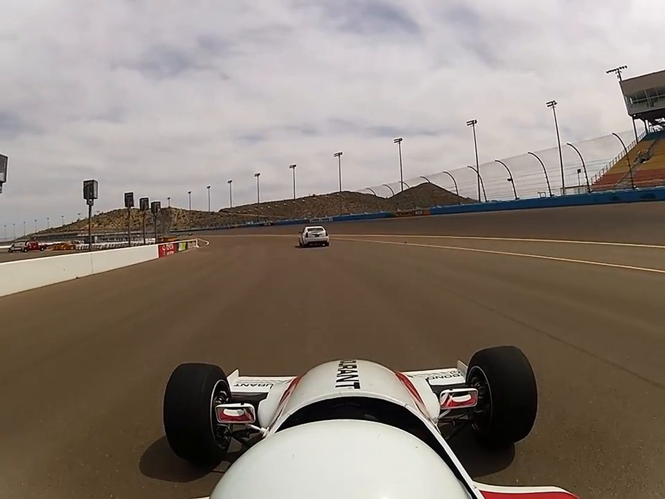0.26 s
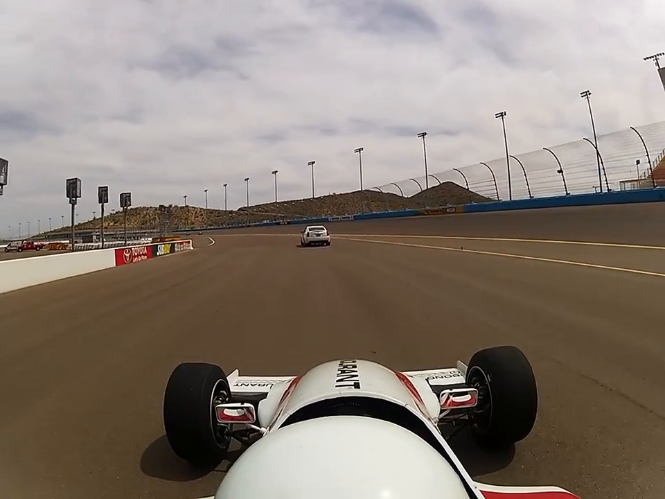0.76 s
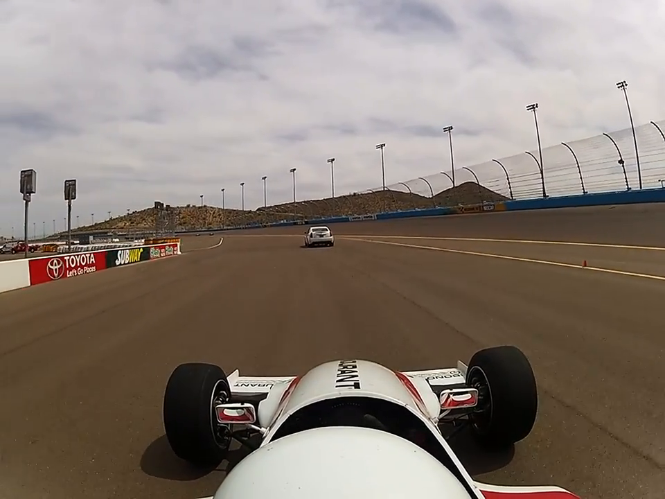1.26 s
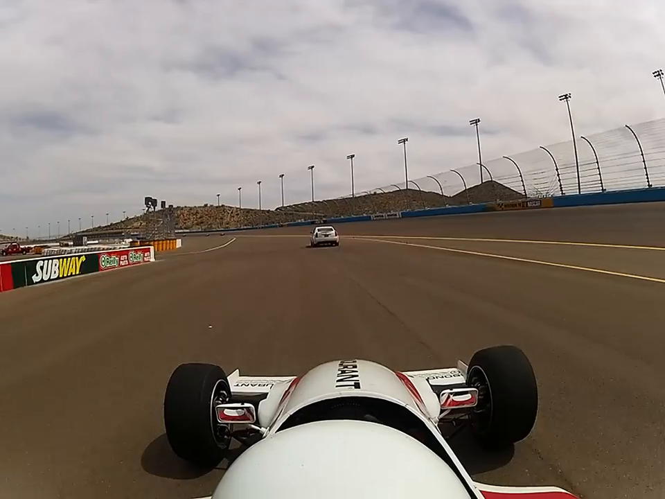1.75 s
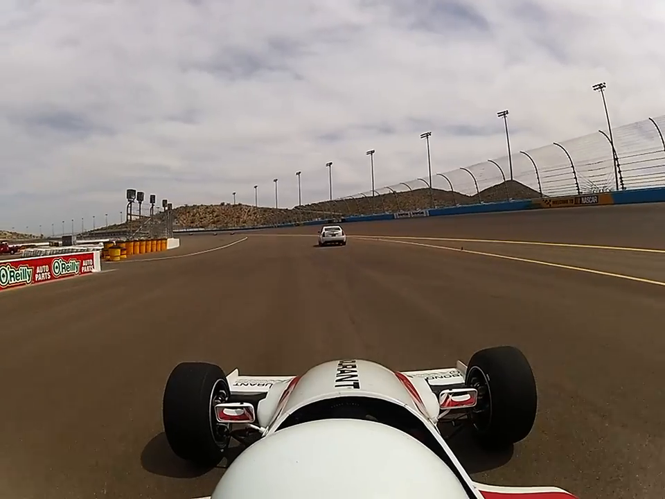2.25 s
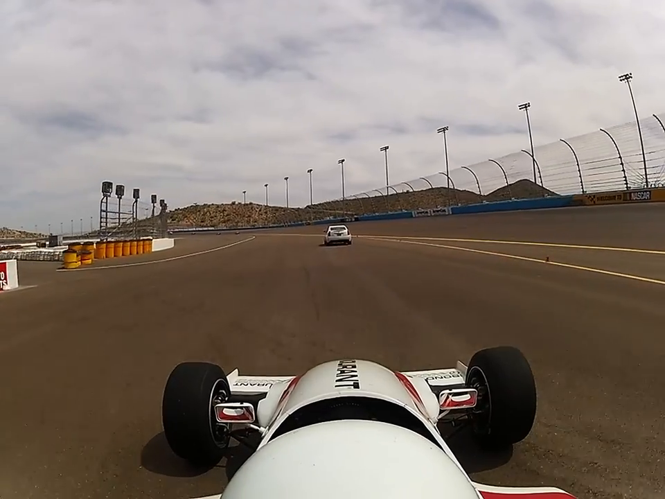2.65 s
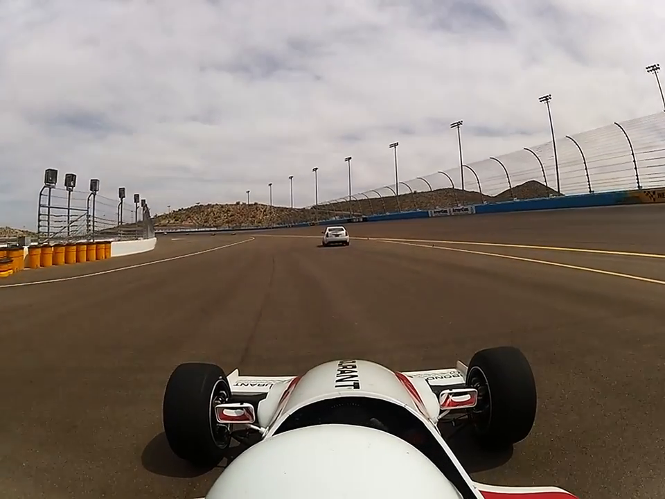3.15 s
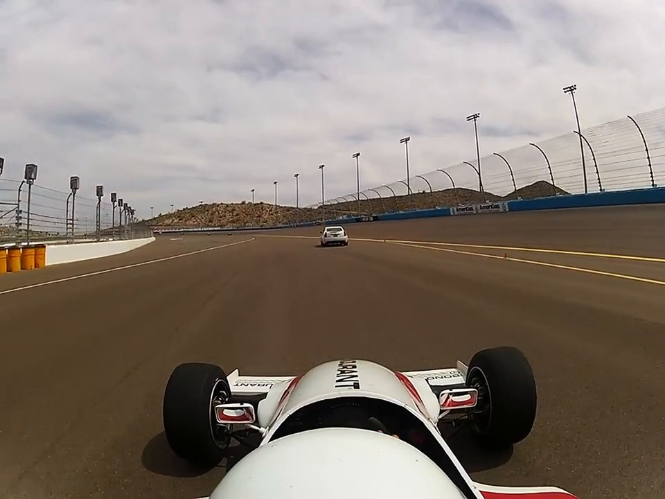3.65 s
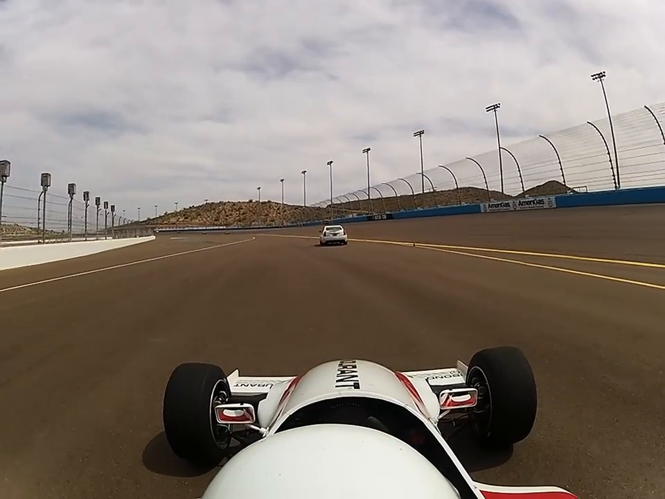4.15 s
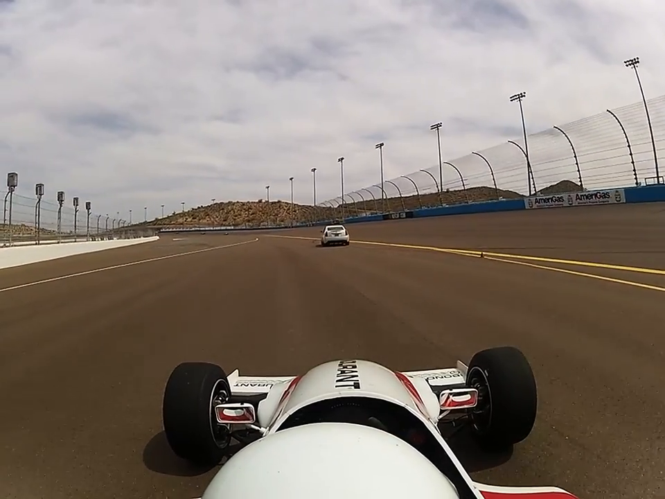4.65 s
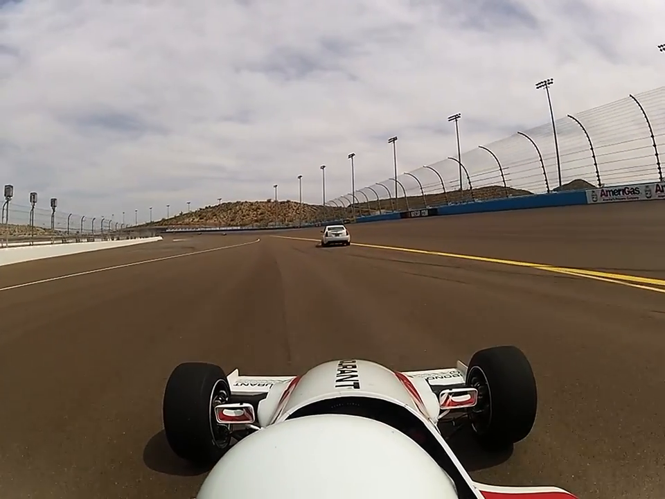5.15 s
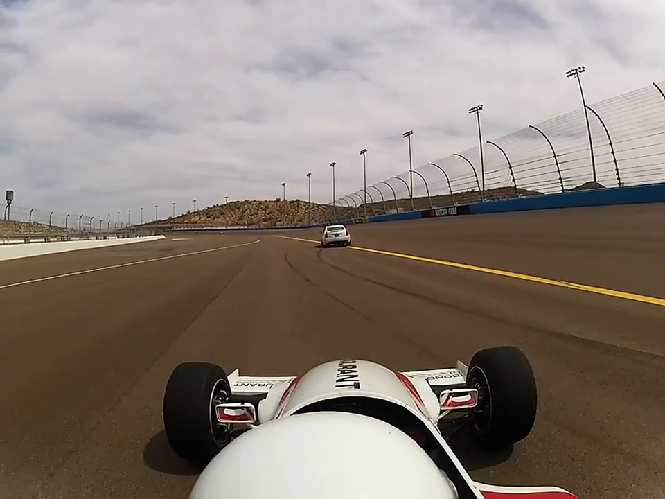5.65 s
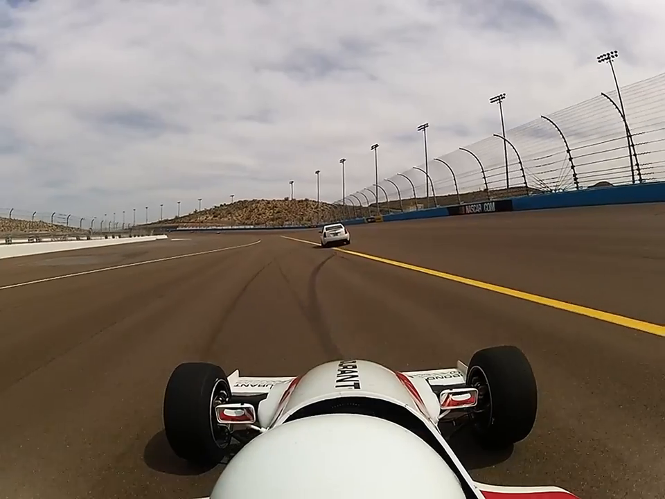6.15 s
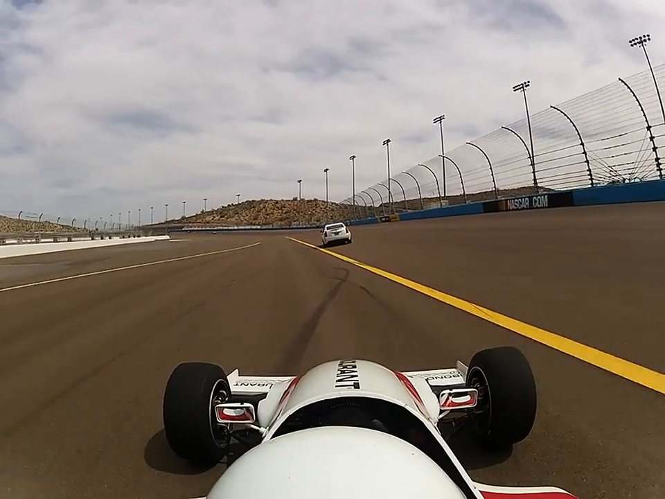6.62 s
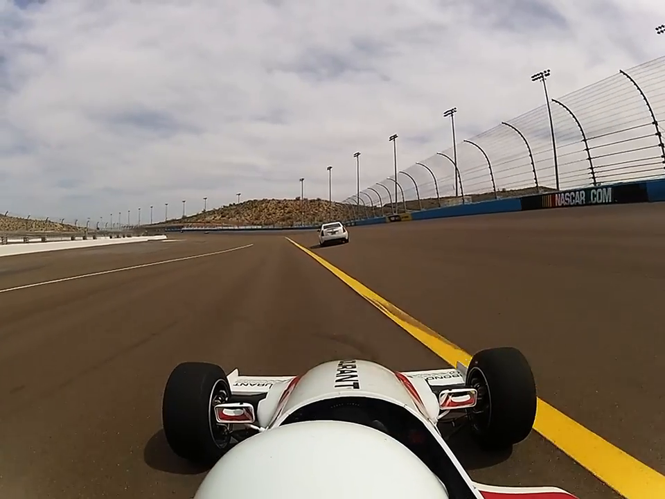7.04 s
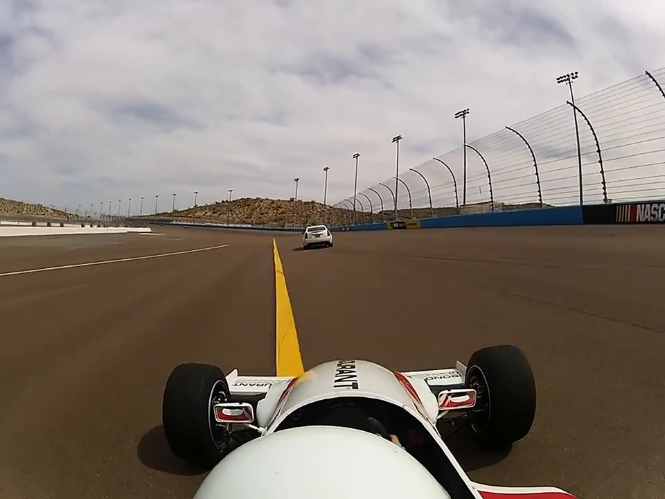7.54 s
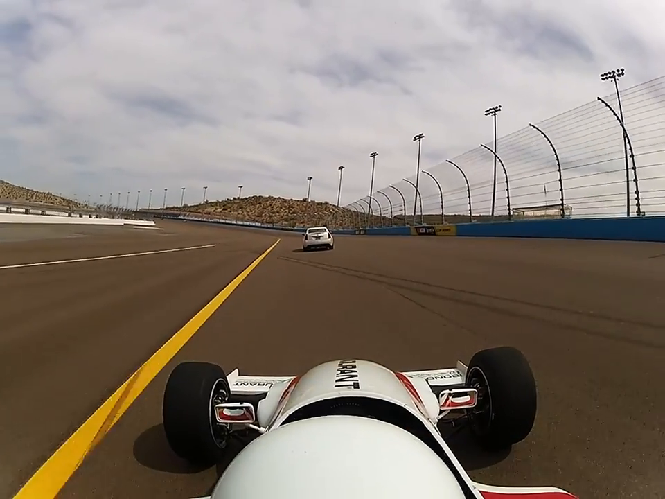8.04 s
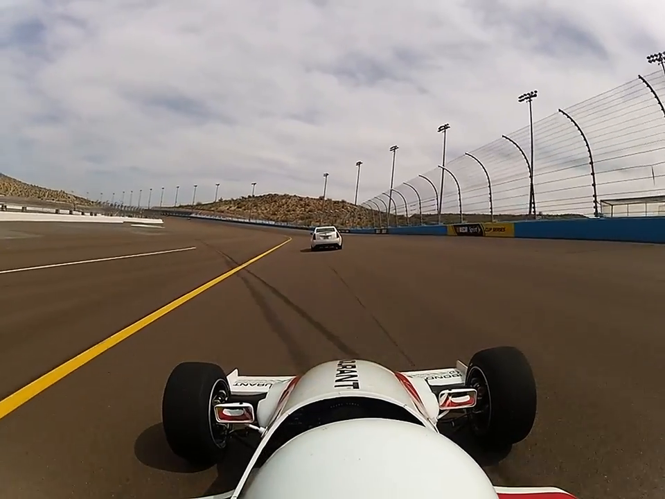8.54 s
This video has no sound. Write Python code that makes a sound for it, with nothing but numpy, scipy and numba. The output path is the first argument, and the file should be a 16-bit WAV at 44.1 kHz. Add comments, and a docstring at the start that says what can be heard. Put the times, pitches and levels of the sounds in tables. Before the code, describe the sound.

A racing engine hums evenly at light load amid boxed-in wind roar and chassis vibration, with a few dull knocks. It then accelerates, swelling into a fuller resonant drone with fluttering hiss. A slow gear change brings falling revs, sharp clacks and a low thudding jolt before the engine pulls on at lower pitch. Close, limited, gritty onboard sound on an outdoor track.

```python
"""Rotary-engined racing car heard inside a sealed camera housing

The camera rides on the roll hoop of an open-wheel car with a two-rotor engine. Sines at shaft orders hum and rise;
filtered noise adds exhaust boom, and wind and chassis vibration that ring the housing. In a slow gear change most
lines weaken, clunks ring as short noise bursts, and a low oscillation shudders as the clutch bites.
The recorder limits peaks and holds each sample of a low rate, which adds mirrored treble."""
import sys
import numpy as np
from scipy import signal
from scipy.fft import rfft, irfft
from scipy.io import wavfile
from scipy.ndimage import uniform_filter1d, minimum_filter1d
from numba import njit

SR = 44100
rng = np.random.default_rng(int(sys.argv[2]) if len(sys.argv) > 2 else 0)


def wav_record(signal):
    """Record a signal, one row per channel, as 16-bit PCM in the file named by sys.argv[1]."""
    frames = np.transpose(np.atleast_2d(signal))
    bounded = np.clip(frames, -1, 1)
    # unit amplitude maps onto the largest positive 16-bit level
    quanta = np.round(bounded * 32767).astype(np.int16)
    wavfile.write(sys.argv[1], SR, quanta)


N = 387198
LIGHT_LOAD = .35  # on a scale from 0, off throttle, to 1, full load


def undb(db):
    """Logarithmic level: decibels become an amplitude ratio."""
    return 10 ** (np.asarray(db) / 20)


def unit(x):
    """Power normalization: scale to an rms of 1."""
    return x / np.sqrt(np.mean(x ** 2))


def colour(x, points, bells=(), size=8192):
    """Minimum-phase filtering: a (Hz, dB) outline plus bells; white noise keeps its power, so dB are relative."""
    hz = np.arange(size // 2 + 1) * SR / size + 1
    corner_hz, corner_db = np.transpose(points)
    db = np.interp(np.log(hz), np.log(corner_hz), corner_db)
    for centre, width, bell_db in bells:
        db = db + bell_db * np.exp(-np.log(2) * (2 * (hz - centre) / width) ** 2)
    # folding the cepstrum onto positive times makes the response causal
    cepstrum = irfft(np.log(undb(db)))
    cepstrum[1:size // 2] *= 2
    cepstrum[size // 2 + 1:] = 0
    response = irfft(np.exp(rfft(cepstrum)))
    response = unit(response) / np.sqrt(size)
    return signal.fftconvolve(x, response)[:N]


def walk(rate):
    """Slow random modulation: levels held 1 / rate s, smoothed by two moving averages, with mean 0 and spread 1."""
    hold = int(SR / rate)
    steps = np.repeat(rng.standard_normal(N // hold + 1), hold)
    smooth = uniform_filter1d(uniform_filter1d(steps, hold), hold)[:N]
    return (smooth - smooth.mean()) / smooth.std()


def by_load(load, db):
    """Load dependence: interpolate between the off throttle, light load and full load levels."""
    return np.interp(load, [0, LIGHT_LOAD, 1], db)


def drive():
    """Uniform acceleration: shaft speed is linear in each stage; the pedal slides from the last load to the new."""
    # stages of the drive; pedal_s is the time the pedal takes to reach the load
    # columns: start_s, shaft_hz (at the start), climb_hz_per_s, load (0-1), pedal_s
    stages = [(0, 44.0, .55, .35, .1), (1.25, 44.05, .83, .35, .1), (2.7, 45.25, 2.95, 1.0, .5),
              (4.3, 49.95, 2.3, 1.0, .1), (5.02, 50.9, -1.9, 0, .04), (6.18, 40.5, .9, .85, .07),
              (7.0, 41.25, .62, .6, 1.8)]
    clutch_s = .07  # the revs slip this long into a new gear
    t = np.arange(N) / SR
    start, hz, climb, load, pedal_s = np.transpose(stages)
    stage = np.searchsorted(start, t, side="right") - 1
    age = t - start[stage]
    shaft_hz = uniform_filter1d(hz[stage] + climb[stage] * age, int(clutch_s * SR))
    before = load[np.maximum(stage - 1, 0)]
    pedal = np.minimum(age / pedal_s[stage], 1)
    return shaft_hz, before + (load[stage] - before) * pedal


def engine(shaft_hz, load):
    """Order spectrum: lines at multiples of shaft speed; uneven combustion makes each swell and waver on its own."""
    # shaft orders: even ones are the firings, odd ones rotor unbalance, 7.5 a gear mesh
    # columns: multiple, off_throttle_db, light_load_db, full_load_db
    orders = [(1, -44, -30, -33), (2, -38, -43, -26.5), (3, -48, -35, -42), (4, -60, -40, -35),
              (5, -60, -36, -45), (6, -35, -33, -31), (7, -50, -36, -41), (7.5, -39, -42, -38),
              (8, -55, -50, -32), (10, -45, -38, -33), (14, -60, -48, -44), (15, -60, -50, -44)]
    # passage of the lines through the mount; columns: frequency_hz, level_db
    mount = [(41, -5), (44, 0), (185, 0), (215, -4), (250, -6.5), (280, 1), (300, 3), (335, 6), (352, -5),
             (385, -2), (417, 3), (445, -4), (600, 0), (20000, 0)]
    turns = np.cumsum(shaft_hz * (1 + .0015 * walk(8))) / SR
    lines = 0
    for multiple, *db in orders:
        waver_db = 2.0 * walk(2) + 1.2 * walk(14)
        gain = undb(by_load(load, db) + waver_db)
        phase_turns = multiple * turns + .015 * walk(9) + rng.random()
        lines = lines + gain * np.sin(2 * np.pi * phase_turns)
    return np.sqrt(2) * colour(lines, mount)


def drone(load):
    """Broadband excitation and resonance: exhaust boom fills in between the lines; a panel rings most at full load."""
    # exhaust roughness; columns: frequency_hz, density_db_per_hz
    roughness = [(60, -21), (110, 3.5), (160, -3), (230, -18), (350, -27.5), (1500, -89)]
    # level of the ringing panel; columns: off_throttle_db, light_load_db, full_load_db
    panel_db = (-60, -48, -30)
    panel_hz, panel_width_hz = 325, 12
    boom = colour(rng.standard_normal(N), roughness)
    boom_gain = undb(-32 + 2.4 * load) * np.clip(load / LIGHT_LOAD, .25, 1)
    resonance = signal.iirpeak(panel_hz, panel_hz / panel_width_hz, fs=SR)
    panel = unit(signal.lfilter(*resonance, rng.standard_normal(N)))
    return boom_gain * boom + undb(by_load(load, panel_db)) * panel


def shudder():
    """Driveline oscillation: a few hard low swings with a thudding edge, growing until the clutch locks."""
    # the clutch bites and the driveline shudders; columns: start_s, end_s, swing_hz, level_db
    bite = (6.153, 6.258, 65, -11)
    start, end, hz, db = bite
    t = np.arange(N) / SR
    fade_in = np.clip((t - start) / .01, 0, 1)
    fade_out = np.clip((end - t) / .008, 0, 1)
    grow = fade_in * fade_out * (.7 + 3 * (t - start))
    swing = np.tanh(0.9 * np.sin(2 * np.pi * hz * (t - start)))  # flattened crests
    thud_outline = [(15, -6), (40, 2), (130, 0), (250, -9), (450, -4), (600, -12), (1500, -60)]  # Hz, dB per Hz
    thud = colour(rng.standard_normal(N), thud_outline)
    return undb(db) * grow * (swing + .55 * thud)


def knocks():
    """Impact excitation: noise bursts rise fast, sag and stop suddenly; a padded band plus a metallic edge."""
    # clunks and knocks; padded_hz is the centre of the padded band
    # columns: start_s, level_db, length_ms, sharpness (0-1, metallic share of power), padded_hz
    blows = [(.341, -.5, 10, .02, 1040), (1.165, -7, 14, .2, 1850), (5.025, 1, 12, .6, 1900),
             (5.4465, 2.5, 14, .65, 2300), (5.589, -9, 10, .9, 2200), (5.598, -2.5, 12, .7, 500),
             (5.611, -5, 17, .15, 1900), (6.244, -7, 12, .01, 500), (6.250, -8.5, 10, .01, 1800)]
    # colour of metal on metal; columns: frequency_hz, level_db
    metal = [(600, -25), (1500, -10), (2300, 2), (3000, 0), (3700, 5), (5100, 8), (20000, -2)]
    padded_db, padded_q = 8.5, 3.5  # low Q: the padded part is a broad band
    t = np.arange(2048) / SR
    padded, edge = np.zeros(N), np.zeros(N)
    for s, db, ms, sharp, hz in blows:
        low, high = rng.standard_normal((2, len(t)))
        age = t * 1000 / ms  # in burst lengths
        at = slice(int(s * SR), int(s * SR) + len(t))
        burst = undb(db) * np.clip(age / .25, 0, 1) * np.exp(-.8 * age - age ** 6)
        band = signal.iirpeak(hz, padded_q, fs=SR)
        padded[at] += np.sqrt(1 - sharp) * signal.lfilter(*band, burst * low)
        edge[at] += np.sqrt(sharp) * burst * high
    return undb(padded_db) * padded + colour(edge, metal)


def bumps():
    """Transient displacement: a turn and a half of a low sine, downward first, under a smooth window."""
    # dull bumps through the mount; columns: start_s, level_db, swing_hz
    jolts = [(1.927, -7, 68), (7.808, -10, 58)]
    out = np.zeros(N)
    for s, db, hz in jolts:
        turn = np.arange(int(1.5 * SR / hz)) * hz / SR
        window = np.sin(np.pi * turn / 1.5) ** .5
        at = slice(int(s * SR), int(s * SR) + len(turn))
        out[at] -= undb(db) * np.sin(2 * np.pi * turn) * window
    return out


def swells():
    """Gaussian envelopes: soft rises in dB of the bright part of the roar."""
    # each swell, with its length between the points at 1/e of the rise; columns: middle_s, rise_db, length_ms
    rises = [(1.79, 2, 43), (2.74, 5, 40), (2.87, 5, 44), (3.12, 6.5, 40), (3.265, 7.5, 61),
             (3.415, 8.5, 54), (3.92, 4.5, 57), (4.22, 3, 40), (4.4, 4.5, 36), (4.49, 2, 36),
             (4.94, 9.5, 49)]
    t = np.arange(N) / SR
    return sum(db * np.exp(-(2000 * (t - s) / ms) ** 2) for s, db, ms in rises)


def roar(load):
    """Turbulent noise: wind and frame buzz as a gusting hiss, with a bright part that flutters on its own."""
    # level of the whole roar; columns: off_throttle_db, light_load_db, full_load_db
    load_db = (-17, -16.5, -16.5)
    # level of the bright part against the rest; columns: time_s, level_db
    bright_course = [(0, -5.5), (1.3, -7.5), (1.8, -3), (3.4, -3), (4.9, -3.5), (5.2, -21), (6.0, -9),
                     (6.3, -0.5), (7.7, -13), (8.78, -1.5)]
    roar_db = by_load(load, load_db) + 0.85 * walk(3.01)
    gust_db = 0.43 * walk(8) + 0.5 * walk(20) + 0.96 * walk(50)
    body = undb(gust_db) * rng.standard_normal(N)
    bright = colour(rng.standard_normal(N), [(1200, -14.5), (2500, 4.5), (20000, 1.5)])
    bright_db = np.interp(np.arange(N) / SR, *np.transpose(bright_course)) + swells()
    flutter_db = 0.5 * walk(10) + 2.4 * walk(35)
    return undb(roar_db) * (body + undb(bright_db + flutter_db) * bright)


def rumble(load):
    """Structure-borne noise: low random shaking of the car, wavering and following the load."""
    # shape of the shaking; columns: frequency_hz, density_db_per_hz
    shaking = [(15, -22), (28, -19), (40, -15), (60, 1.5), (80, -3), (110, -7.5), (150, -15), (220, -32),
               (400, -52), (1500, -100)]
    # its level; columns: off_throttle_db, light_load_db, full_load_db
    load_db = (-26, -24.5, -24)
    level_db = by_load(load, load_db) + walk(5)
    return undb(level_db) * colour(rng.standard_normal(N), shaking)


def housing(outside):
    """Transmission loss and cavity resonance: the wall shapes the sound, the housing adds peaks and nulls."""
    # what gets through the housing wall; columns: frequency_hz, density_db_per_hz
    wall = [(60, -13), (230, -16.5), (300, -6), (550, -3), (750, -16.5), (1500, -16.5), (2300, -15),
            (2600, -28.5), (3900, -27), (4150, -38.5), (4800, -45.5), (5400, -50), (5800, -62), (6000, -71)]
    # housing resonances and nulls; columns: centre_hz, width_hz, level_db
    modes = [(261, 32, 2.5), (298, 38, 1.2), (326, 27, 2), (356, 43, -4.5), (427.7, 58, 5), (490, 53, 3.5),
             (567, 62, 1), (838, 88, 10), (857, 70, -10), (1010.4, 108.5, 15.5), (1053, 35, 5),
             (1165, 138, 8.5), (1388, 105, 4), (1720, 154, 7), (1836, 99, 13.5), (1910, 50, 0.5),
             (2173, 89, 5), (2397, 43, 4), (2888, 124, 8), (3053, 153, 6.5), (3412, 190, 6), (3744, 73, 6),
             (5144, 340, 15.5), (5555, 44, -8), (5750, 230, 11)]
    return colour(outside, wall, modes)


def scene():
    """Superposition: engine, drone, shudder, bumps and rumble come through the mount, the rest through the wall."""
    shaft_hz, load = drive()
    through_mount = engine(shaft_hz, load) + drone(load) + shudder() + bumps() + rumble(load)
    through_wall = housing(knocks() + roar(load))
    return (through_mount + through_wall)[None]


@njit
def limiter(x, sensed, top, attack, release):
    """Peak limiting: the gain dives when the sensed peak passes the ceiling and creeps back."""
    y, gain = np.empty(len(x)), 1.
    for i in range(len(x)):
        want = min(1., top / (abs(sensed[i]) + 1e-9))
        gain += (want - gain) * (attack if want < gain else release)
        y[i] = gain * x[i]
    return y


def record(dry):
    """Limiting, then zero-order hold: 12 kHz samples last four 48 kHz ticks, mirroring the sound above 6 kHz."""
    # what the limiter listens to, weak in the bass; columns: frequency_hz, level_db
    sense = [(60, -13), (300, -2.5), (20000, -6.5)]
    ceiling_db, attack_s, release_s = -4, .0015, .082
    hold, top_hz = 4, 15250
    reach = int(2 * attack_s * SR)
    # peaks (negative here) are seen a moment ahead and remembered a moment after
    sensed = minimum_filter1d(-np.abs(colour(dry[0], sense)), size=2 * reach + 1)
    limited = limiter(dry[0], sensed, undb(ceiling_db), 1 / (attack_s * SR), 1 / (release_s * SR))
    slow = signal.resample_poly(limited, 40, 147)  # 44.1 to 12 kHz
    held = signal.resample_poly(np.repeat(slow, hold), 147, 160)  # 48 to 44.1 kHz
    held = np.pad(held, (0, hold))[:N]
    lowpass = signal.ellip(10, .2, 70, top_hz, fs=SR, output="sos")
    return signal.sosfilt(lowpass, held)[None]


dry = scene()
out = record(dry)
wav_record(out)
```